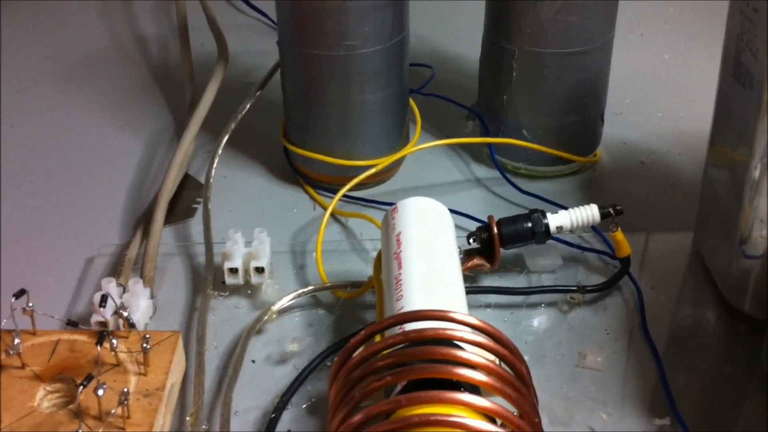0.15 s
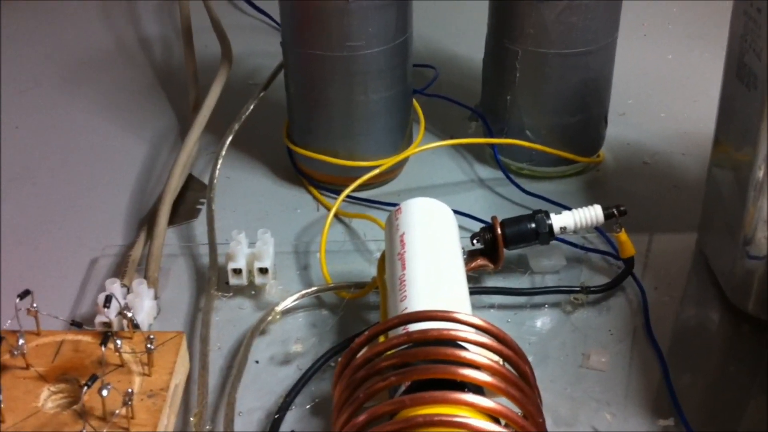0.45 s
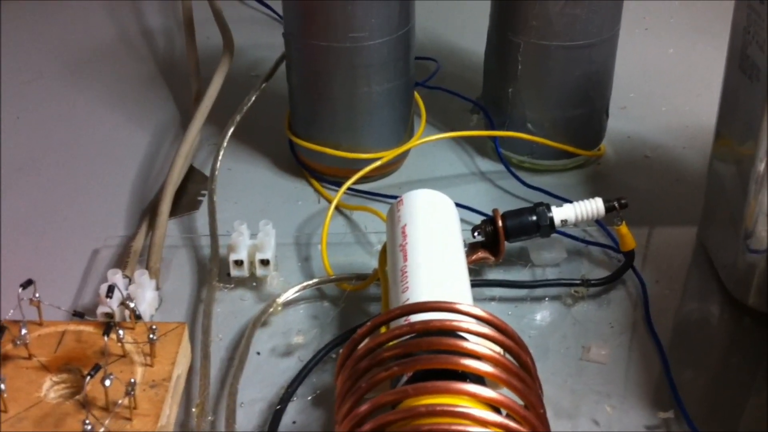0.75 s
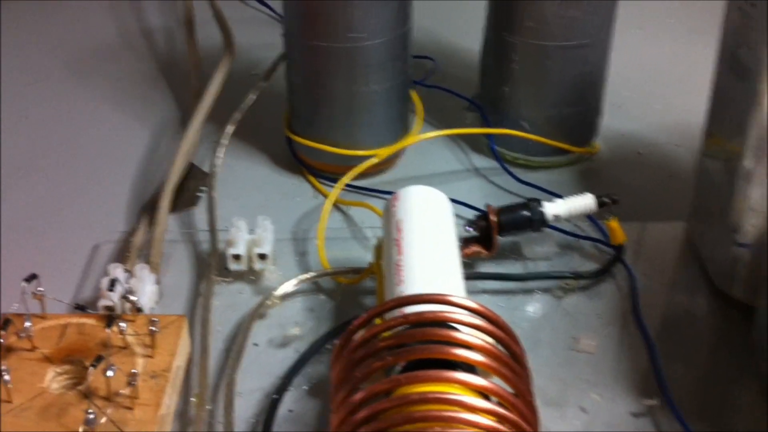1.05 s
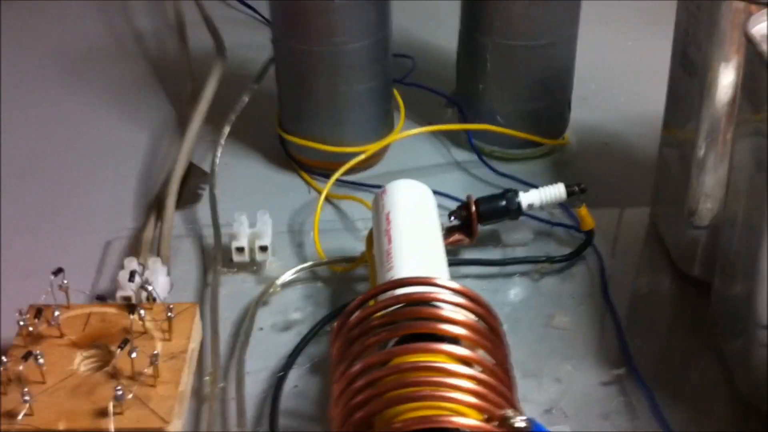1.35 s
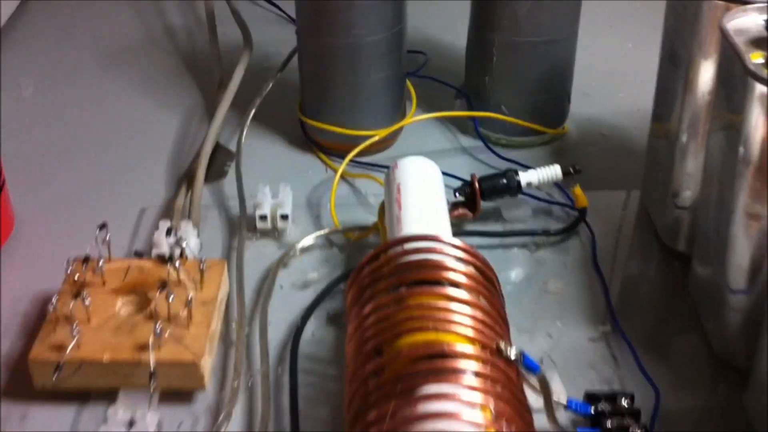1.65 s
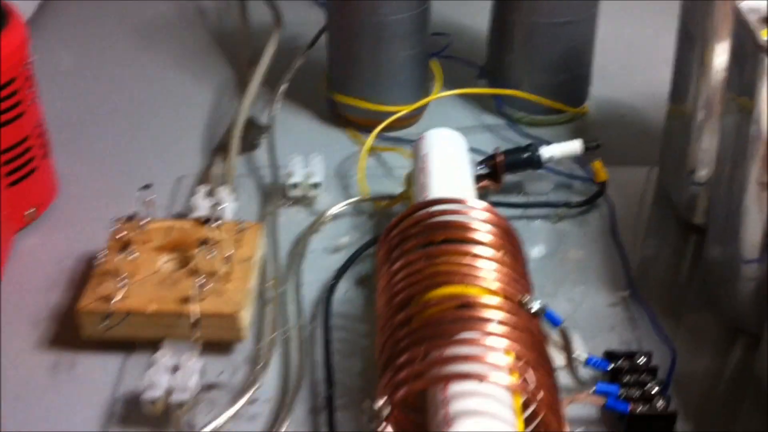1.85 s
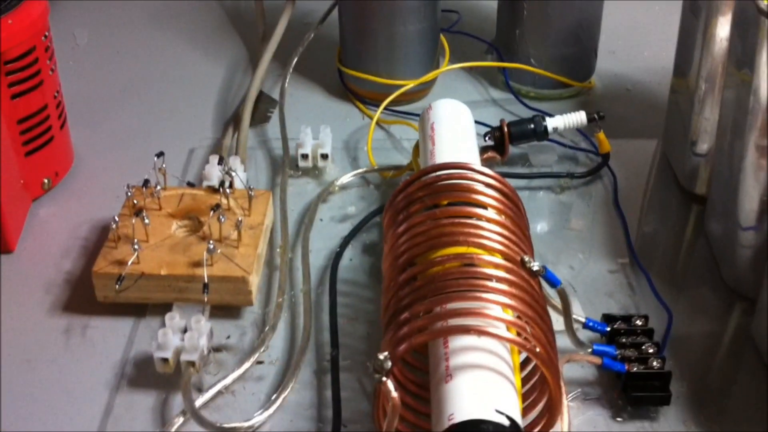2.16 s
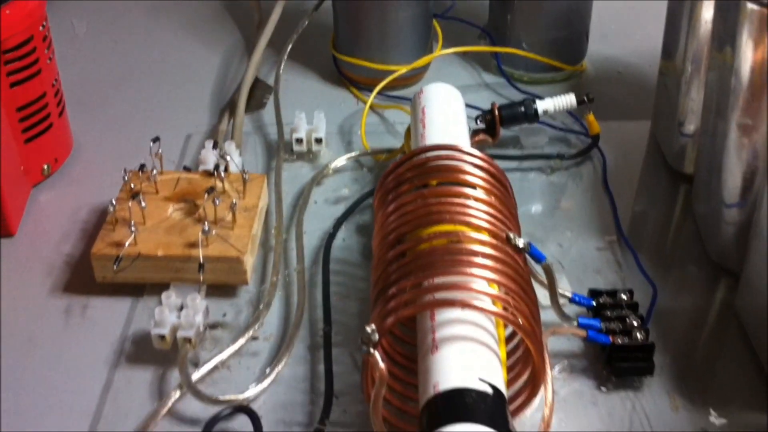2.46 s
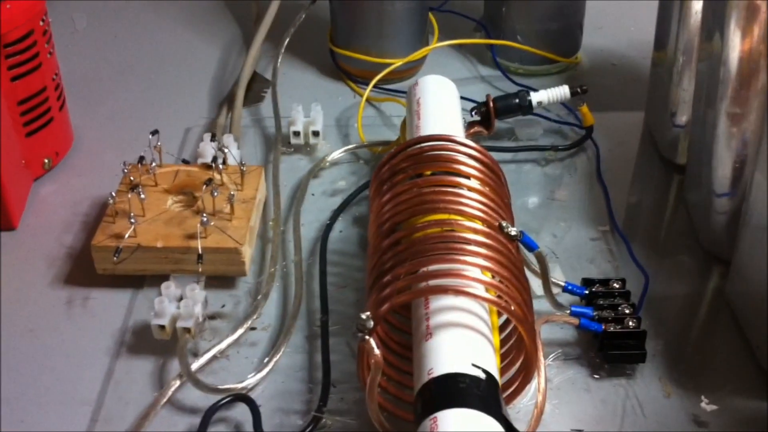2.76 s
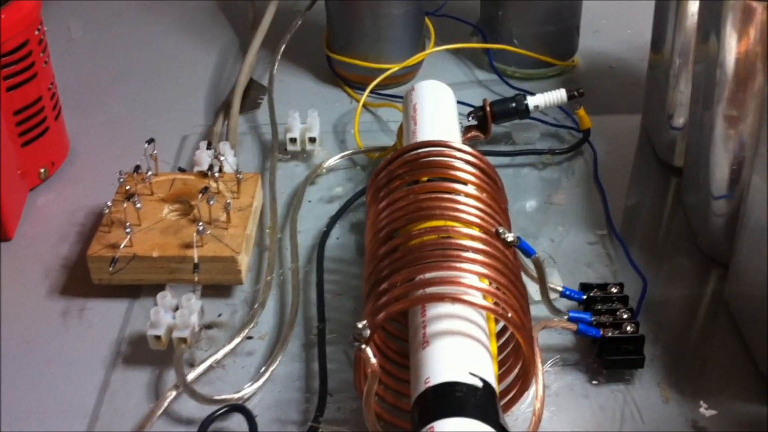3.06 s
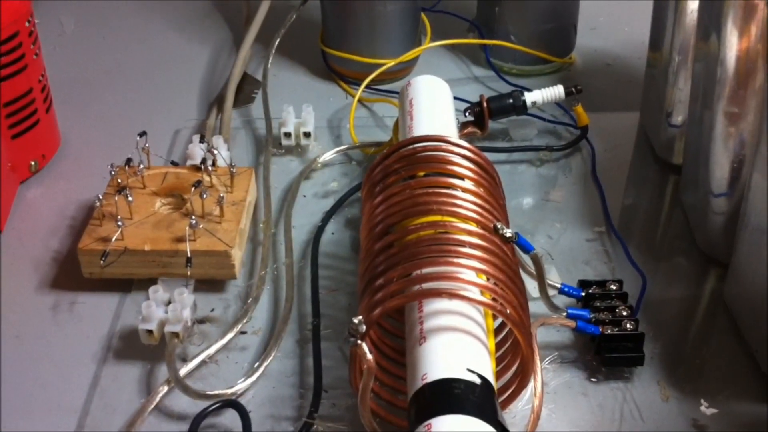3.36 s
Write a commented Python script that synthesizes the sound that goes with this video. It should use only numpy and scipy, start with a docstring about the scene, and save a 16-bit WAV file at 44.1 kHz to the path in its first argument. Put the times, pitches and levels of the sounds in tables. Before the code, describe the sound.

A high-voltage arc buzzes and crackles without pause across a spark plug gap on a workshop bench, flaring into irregular louder snaps. Its tone shifts slightly as the close microphone draws back, with faint hum and hiss underneath.

```python
"""The spark gap of a mains-fed high-voltage coil arcs steadily on a workshop bench.
Each mains half-cycle fires a short volley of sparks and a hollow pop; some flare into louder snaps.
Nearby parts scatter the clicks, whose colour changes as the microphone draws back along the coil.
Faint transformer hum, hiss and rumble lie underneath; now and then the low end dips briefly."""
import sys
import numpy as np
from scipy import signal
from scipy.fft import rfft, irfft
from scipy.io import wavfile
from scipy.ndimage import uniform_filter1d, map_coordinates

SR = 44100
rng = np.random.default_rng(int(sys.argv[2]) if len(sys.argv) > 2 else 0)


def digitize_waveform(pressure):
    """Quantize a signal to 16-bit integers and store it at the path in sys.argv[1].

    Rows of a 2-D input are taken as channels; values are limited to [-1, 1].
    """
    field = np.atleast_2d(pressure).T
    bounded = np.clip(field, -1, 1)
    quanta = np.round(bounded * 32767).astype(np.int16)
    wavfile.write(sys.argv[1], SR, quanta)


N = 154350
TIME_S = np.arange(N) / SR

MAINS_HZ, STRIKE_JITTER_S = 60.016, .00028
MOVE_S = [1.2, 1.65, 2.15]  # microphone places: close, half way, drawn back
# volleys that flare: time_s, crack_extra_db, pop_extra_db
SNAPS = [(0.083, 5, 12), (0.091, 3, 10), (0.183, 1, 9), (0.2, 0, 9), (0.208, 0, 9), (0.216, 0, 8),
         (0.385, 6.5, 5), (0.475, 1, 10), (0.541, 2, 10), (0.701, 6, 7), (0.726, 7, 8), (0.86, 8, 10),
         (0.926, 2.3, 6), (1.068, 4.5, 3), (1.1, 1, 10), (1.116, 0, 9), (1.183, 3, 7), (1.41, 4.5, 10),
         (1.466, 0, 9), (1.484, 4.5, 10), (1.499, 2, 13), (1.516, 1, 10), (1.584, 5, 6), (1.634, 6.5, 12),
         (1.783, 1, 10), (1.816, 1, 10), (1.909, 4.5, 3), (2.026, 4.5, 8), (2.083, 2, 10), (2.234, 4.5, 7),
         (2.25, 3, 9), (2.368, 5, 9), (2.382, 1, 12), (2.699, 2, 10), (2.776, 7, 3), (2.849, 2, 10),
         (2.942, 5.5, 9), (3.099, 3, 0), (3.232, 0, 11), (3.459, 8, 3)]


def undb(db):
    """Decibels to gain."""
    return 10 ** (np.asarray(db) / 20)


def unit(x):
    """Scale to unit energy."""
    return x / np.sqrt(np.sum(x ** 2))


def walk(rate_hz):
    """Smoothed random steps, unit spread."""
    hold = int(SR / rate_hz)
    steps = np.repeat(rng.standard_normal(N // hold + 1), hold)
    smooth = uniform_filter1d(uniform_filter1d(steps, hold), hold)[:N]
    return smooth / smooth.std()


def noise(edges_hz, kind):
    """Filtered noise, unit rms."""
    y = signal.sosfilt(signal.butter(2, edges_hz, kind, fs=SR, output="sos"), rng.standard_normal(N))
    return y / y.std()


def through(x, response):
    """Convolve with an impulse response."""
    return signal.fftconvolve(x, response)[:N]


def causal(gain):
    """Minimum-phase spectrum with this gain."""
    cepstrum = irfft(np.log(gain))
    half = len(cepstrum) // 2
    cepstrum[1:half] *= 2
    cepstrum[half + 1:] = 0
    return np.exp(rfft(cepstrum))


def clicks(times_s, sizes, order=8):
    """Band-limited impulses at exact times."""
    at = times_s[:, None] * SR
    taps = np.floor(at).astype(int) + np.arange(1 - order, order + 1)
    shape = sizes[:, None] * np.sinc(taps - at) * np.sinc((taps - at) / order)
    inside = (taps >= 0) & (taps < N)
    return np.bincount(taps[inside], shape[inside], N)


def half_cycles(first_s=-.0002):
    """Start times of the mains half-cycles."""
    return np.arange(first_s, N / SR, 1 / (2 * MAINS_HZ))


def rumble(air_db=-62):
    """Low workshop noise, plus handling rumble that grows as the microphone moves."""
    handling_db = np.interp(TIME_S, MOVE_S, [-80, -74, -72]) + 4.2 * walk(rate_hz=12)
    air = undb(air_db + 3 * walk(rate_hz=20)) * noise([115, 350], "bandpass")
    return air + undb(handling_db) * noise(95, "lowpass")


def transformer(level_db=-62.8, waver_db=2.8):
    """Wavering hum on even multiples of the mains."""
    # hum lines: mains_multiple, relative_db
    harmonics = [(2, -17), (4, 0)]
    phase = 2 * np.pi * MAINS_HZ * TIME_S
    hum = sum(undb(db) * np.sin(round(k) * phase + 2 * np.pi * rng.random()) for k, db in harmonics)
    return np.sqrt(2) * hum * undb(level_db + waver_db * walk(rate_hz=24))


def hiss(level_db=-53):
    """Faint steady hiss."""
    return undb(level_db) * noise([1900, 4500], "bandpass")


def low_dips(x, edge_s=.002):
    """The low end drops out briefly, breaking up the hum."""
    # dips: centre_s, length_s, cutoff_hz, gain_db
    dips = [(0.165, .014, 420, -17), (0.397, .044, 450, -16), (0.444, .034, 450, -18),
            (0.733, .016, 450, -14), (0.866, .022, 550, -16), (1.397, .012, 800, -17),
            (1.418, .005, 700, -12), (1.432, .005, 700, -12), (1.474, .028, 650, -22),
            (1.51, .008, 950, -19), (1.595, .008, 700, -11), (1.626, .026, 650, -18),
            (2.104, .018, 950, -17), (2.69, .015, 750, -19), (3.113, .011, 400, -13)]
    for centre_s, length_s, cutoff_hz, gain_db in dips:
        depth = np.clip((length_s / 2 - abs(TIME_S - centre_s)) / edge_s + 1, 0, 1)
        lows = signal.sosfiltfilt(signal.butter(4, cutoff_hz, fs=SR, output="sos"), x)
        x = x + (undb(gain_db * depth) - 1) * lows
    return x


def room(x, t60_s=.16, onset_s=.003, sway_s=.4, size=12000):
    """Short room tail; its fine pattern renews as the hand-held microphone sways."""
    age_s = np.arange(size) / SR
    decay = np.exp(-np.log(1000) * age_s / t60_s) * (1 - np.exp(-(age_s / onset_s) ** 2))
    tail = np.zeros(N)
    for centre_s in np.arange(0, N / SR + sway_s, sway_s):
        fade = np.sqrt(np.clip(1 - abs(TIME_S - centre_s) / sway_s, 0, 1))
        tail += fade * through(x, unit(decay * rng.standard_normal(size)))
    return tail


def bench(scatter_s=.00043, scatter_db=10, size=4096):
    """Response of the direct path plus quick scatter off the bench, broadly flattened."""
    age_s = np.arange(size) / SR
    reflections = unit(rng.standard_normal(size) * age_s * np.exp(-age_s / scatter_s))
    spectrum = rfft((age_s == 0) + undb(scatter_db) * reflections)
    broad_gain = np.sqrt(uniform_filter1d(abs(spectrum) ** 2, size=25))
    return irfft(spectrum / causal(broad_gain))


def scatter(x, patterns=11):
    """Bench reflections: drift while the microphone rests, churn while it travels."""
    # microphone path, a new pattern each step: time_s, steps
    path = [(0, 0), (1.2, .6), (2.2, 8), (3.5, 9.5)]
    step = np.clip(np.interp(TIME_S, *np.array(path).T), 0, patterns - 1)
    return sum(np.sqrt(np.clip(1 - abs(step - k), 0, 1)) * through(x, bench()) for k in range(patterns))


def echo(x, gain_db=-9.5, cutoff_hz=3500, sway_s=.00003):
    """Small nearby cans reflect only treble; the lag follows the microphone."""
    lag_s = np.interp(TIME_S, MOVE_S, [.0013, .0019, .0024]) + sway_s * walk(rate_hz=5)
    treble = signal.sosfilt(signal.butter(2, cutoff_hz, "highpass", fs=SR, output="sos"), x)
    return undb(gain_db) * map_coordinates(treble, [(TIME_S - lag_s) * SR], order=5)


def slide(x):
    """Narrow peaks and notches swell, glide and fade with the movement."""
    # gliding bands: start_s, end_s, from_hz, to_hz, half_width_hz, gain_db
    bands = [(1.42, 1.64, 7150, 7000, 170, 6), (1.48, 1.62, 7850, 7600, 200, -14),
             (1.42, 1.58, 4800, 5250, 300, -10), (1.64, 1.75, 9300, 8900, 300, -12),
             (1.75, 1.88, 11600, 11000, 300, -10), (1.8, 2.1, 5800, 6300, 160, 4),
             (1.95, 2.6, 8500, 9200, 250, 4), (2.0, 2.6, 8300, 7200, 380, -10),
             (1.95, 2.6, 9700, 10100, 300, -7), (1.85, 2.55, 5000, 5700, 500, -3),
             (2.65, 2.95, 5600, 5700, 450, 3), (2.68, 2.9, 1830, 1860, 90, 4.5),
             (1.84, 1.95, 12300, 12500, 300, -10)]
    for start_s, end_s, from_hz, to_hz, half_width_hz, gain_db in bands:
        on = (TIME_S > start_s) & (TIME_S < end_s)
        progress = (TIME_S[on] - start_s) / (end_s - start_s)
        carrier = np.exp(2j * np.pi * np.cumsum(from_hz + (to_hz - from_hz) * progress) / SR)
        baseband = signal.lfilter(*signal.butter(1, half_width_hz, fs=SR), x[on] / carrier)
        band = 2 * np.real(carrier * baseband)
        x = x.copy()
        x[on] += (undb(gain_db * np.sin(np.pi * progress)) - 1) * band
    return x


def colour(place, size=4096):
    """Response that colours the sparks at one microphone place."""
    # spark spectrum: freq_hz, close_db, half_way_db, back_db
    spectrum = [(40, -38, -36, -35), (120, -33, -35, -35), (230, -14, -15, -15), (330, -9, -10, -11),
                (470, -10.5, -9.5, -7), (720, 1.3, -3, -4.3), (1000, -3, -5.3, -6),
                (1250, -0.7, -1.8, -5.5), (1600, -13.5, -12.5, -14), (2600, -9.5, -12.5, -9),
                (3300, -14, -15, -14), (3900, -7, -8.5, -11), (4900, -7, -7.5, -6.5),
                (5600, -3, -3.5, -4.3), (7400, -2, -2.5, -4.3), (8500, -2, -.5, -1.7),
                (10000, -1, -1, -1.8), (13000, 1.8, 1.2, -.8), (15800, 2.6, 1.3, .4)]
    # ripple from reflections between parts: centre_hz, half_width_hz, close_db, half_way_db, back_db
    ripple = [(1320, 105, 1.5, 1, 4), (1850, 115, 1, 0.5, 3.7), (2110, 70, 0, 5, 0), (3300, 90, -4, 0, 0),
              (3830, 150, 4, 2, -1), (6680, 260, 1.5, 0, 5), (7300, 300, 0, -1, -6), (8400, 170, -3, 0, -3),
              (9700, 300, -2, 0, 2), (10800, 300, 0, 0, -3), (12550, 160, -3, 0, -3), (13400, 300, 2, 2, 5),
              (13950, 150, -5, 0, -2), (14350, 150, 4, 0, -2)]
    hz = np.arange(size // 2 + 1) * SR / size
    knots_hz, *levels_db = np.array(spectrum).T
    db = np.interp(np.log(hz + 1), np.log(knots_hz), levels_db[place])
    for centre_hz, half_width_hz, *heights_db in ripple:
        db += heights_db[place] * np.exp(-((hz - centre_hz) / half_width_hz) ** 2)
    return irfft(causal(undb(db)))


def pops(pitch_hz=1230, rise_s=.0008, delay_s=.0005, spread_db=3.2, size=1024):
    """Each volley sets off a short hollow ring, hardest in the snaps."""
    starts_s, age_s = half_cycles(), np.arange(size) / SR
    level_db = np.interp(starts_s, MOVE_S, [-44.3, -46, -52.5])
    extra_db = spread_db * np.minimum(rng.standard_normal(len(starts_s)), 1.5)
    for time_s, _, pop_db in SNAPS:
        extra_db[np.argmin(abs(starts_s - time_s))] = pop_db
    strike_s = starts_s + delay_s + STRIKE_JITTER_S * rng.standard_normal(len(starts_s))
    ring = age_s / rise_s * np.exp(1 - age_s / rise_s) * np.sin(2 * np.pi * pitch_hz * age_s)
    return through(clicks(strike_s, undb(level_db + extra_db)), ring)


def sparks(max_sparks=10):
    """One volley a half-cycle: the gap breaks down, recharges and refires until the voltage falls."""
    # arc strength: time_s, strength_db
    strengths = [(0.01, -1.0), (0.07, -3.0), (0.15, 3.4), (0.17, -2.5), (0.21, 2.6), (0.26, -2.0),
                 (0.39, 0.4), (0.8, -0.5), (0.99, -1.6), (1.18, 2.6), (1.24, -3.0), (1.42, 2.3),
                 (1.44, -1.3), (1.52, 1.0), (1.62, -2.6), (1.66, 0.7), (1.78, 1.3), (1.87, -1.4),
                 (1.94, 2.6), (1.95, -2.0), (2.05, 2.0), (2.07, -4.6), (2.08, 4.0), (2.14, -1.0),
                 (2.16, 3.0), (2.225, -2.5), (2.235, 3.8), (2.34, -1.5), (2.38, 1.6), (2.4, -1.8),
                 (2.7, 1.8), (2.77, -3.0), (2.79, 3.0), (2.91, -3.3), (2.95, 0.0), (2.99, -2.2),
                 (3.1, -1.2), (3.3, 0.4), (3.36, -5.6), (3.37, -1.4), (3.42, -3.5), (3.44, -9.8),
                 (3.48, -0.0)]
    # recharge between sparks: time_s, recharge_s
    recharges = [(1.7, .0008), (2.3, .00057)]
    volley_spread_db, polarity_db = 2.2, 1.1  # one polarity fires harder
    lead_s_per_db, burn_s_per_db = .00005, .00016  # a stronger arc strikes earlier, burns longer
    burn_s, burn_jitter_s, gap_spread = .00235, .00035, .2
    size_share, fade_db_per_s, spark_spread_db = .46, 700, 2.2

    starts_s = half_cycles()
    flare_draw, strike_draw, burn_draw = rng.standard_normal((len(starts_s), 3)).T
    polarity = (-1) ** np.arange(len(starts_s))
    flare_db = volley_spread_db * np.clip(flare_draw, -2, 1.5) - polarity_db * polarity
    for time_s, crack_db, _ in SNAPS:
        flare_db[np.argmin(abs(starts_s - time_s))] = crack_db
    strength_db = np.interp(starts_s, *np.array(strengths).T) + flare_db
    strike_s = starts_s + STRIKE_JITTER_S * strike_draw - lead_s_per_db * strength_db
    recharge_s = np.interp(starts_s, *np.array(recharges).T)
    length_s = np.maximum(burn_s + burn_s_per_db * strength_db + burn_jitter_s * burn_draw, recharge_s)

    # rows: volleys; columns: sparks
    gaps_s = recharge_s[:, None] * np.exp(gap_spread * rng.standard_normal((len(starts_s), max_sparks)))
    age_s = np.cumsum(gaps_s, axis=1) - gaps_s[:, :1]
    burning = np.clip((length_s[:, None] - age_s) / gaps_s + .5, 0, 1)
    size_db = size_share * strength_db[:, None] - fade_db_per_s * age_s
    size_db += spark_spread_db * rng.standard_normal(age_s.shape)
    size_db[:, 0] -= 8  # a volley opens softly
    return clicks((strike_s[:, None] + age_s).ravel(), (burning * undb(size_db)).ravel())


def arc(gain_db=-7.2, room_db=-3.4):
    """Sparks and their reflections, crossfaded between the microphone places."""
    train = sparks()
    heard = scatter(train) + undb(room_db) * room(train)
    heard = slide(heard + echo(heard))
    fades = [np.interp(TIME_S, MOVE_S, row) for row in np.eye(len(MOVE_S))]
    return undb(gain_db) * sum(fade * through(heard, colour(place)) for place, fade in enumerate(fades))


def scene():
    """Mono mix with brief low-end dips."""
    return low_dips(arc() + pops() + hiss() + transformer() + rumble())[None]


def record(dry, cutoff_hz=15800):
    """Steep low-pass."""
    return signal.sosfilt(signal.ellip(12, .1, 80, cutoff_hz, fs=SR, output="sos"), dry)


dry = scene()
out = record(dry)
digitize_waveform(out)
```